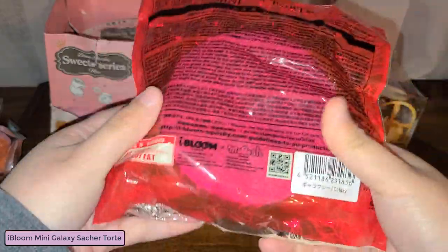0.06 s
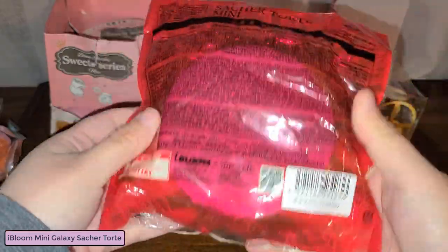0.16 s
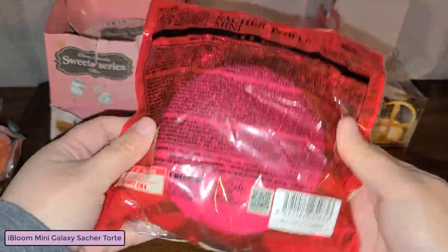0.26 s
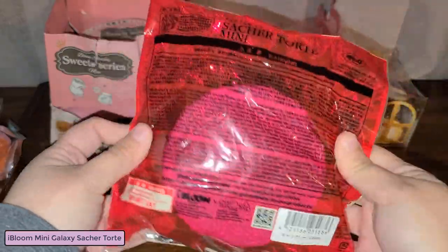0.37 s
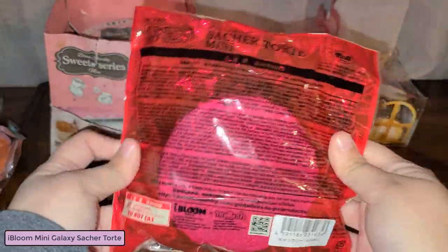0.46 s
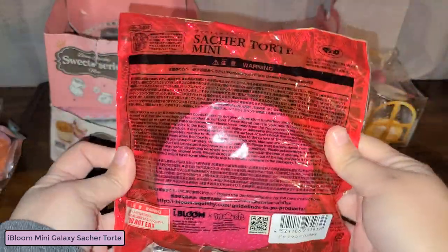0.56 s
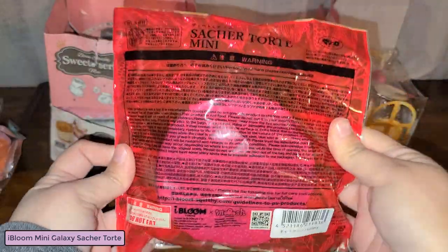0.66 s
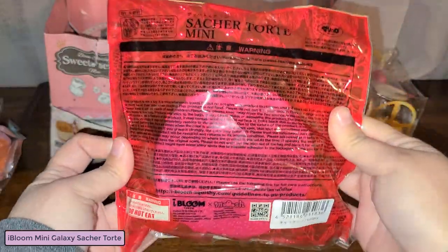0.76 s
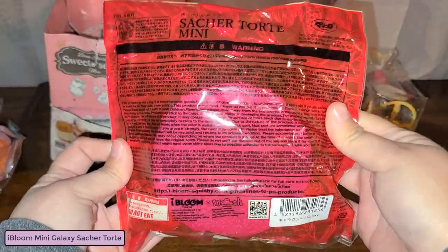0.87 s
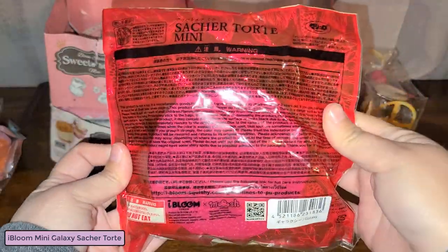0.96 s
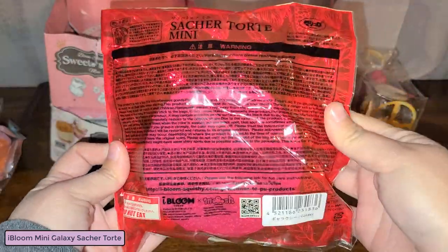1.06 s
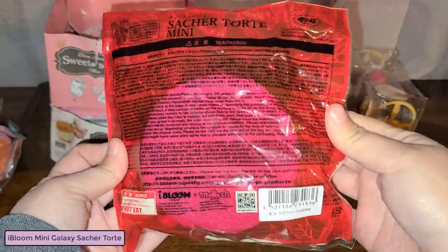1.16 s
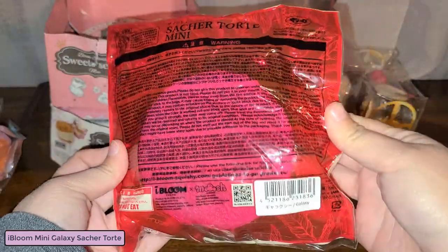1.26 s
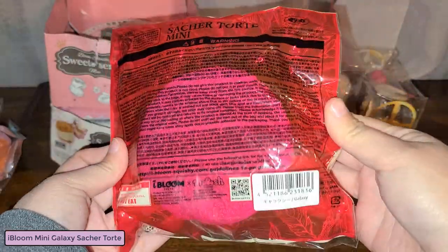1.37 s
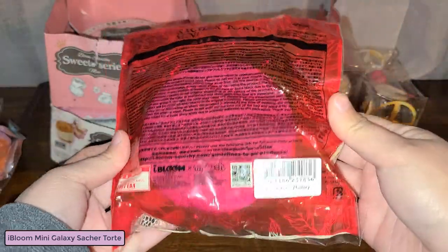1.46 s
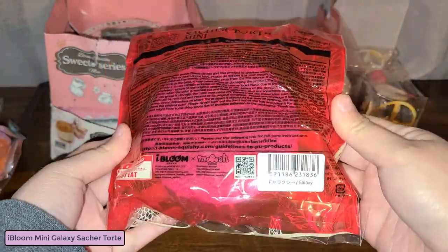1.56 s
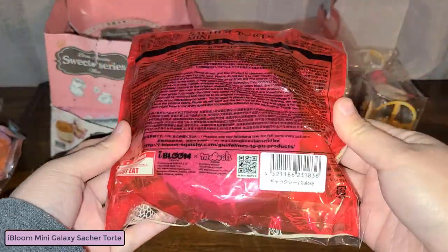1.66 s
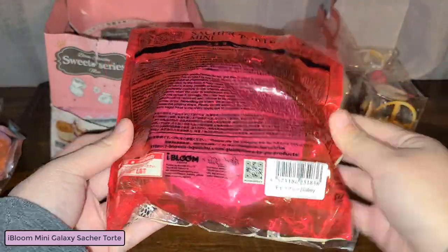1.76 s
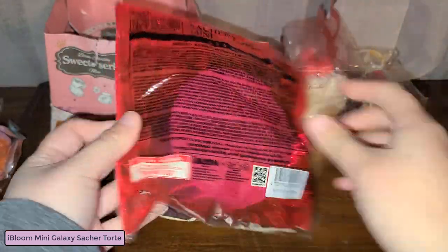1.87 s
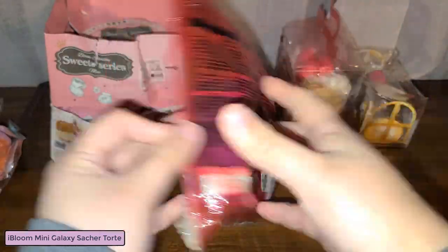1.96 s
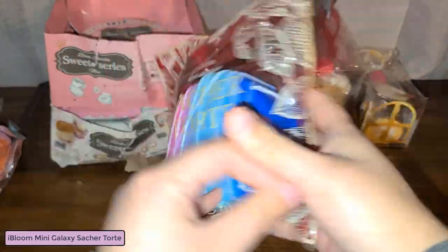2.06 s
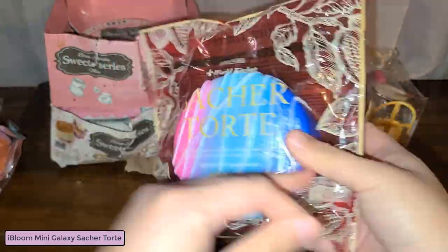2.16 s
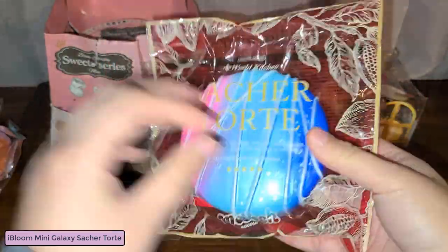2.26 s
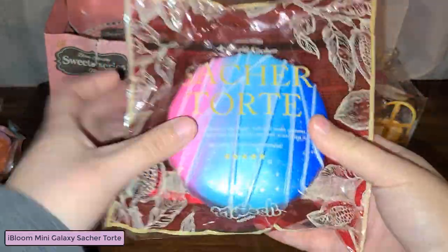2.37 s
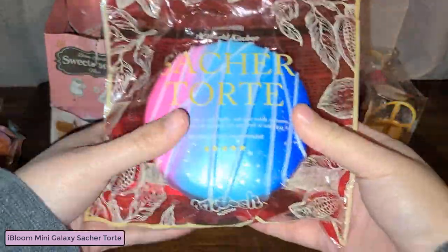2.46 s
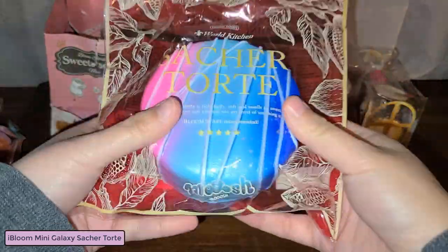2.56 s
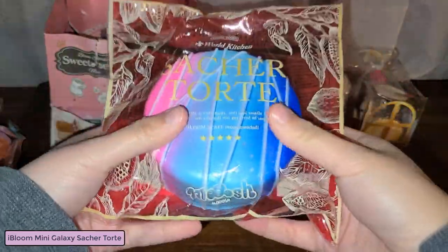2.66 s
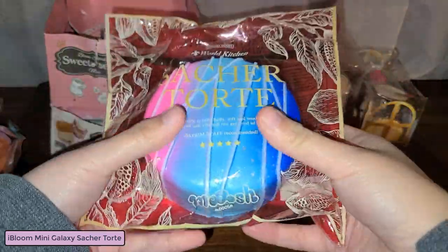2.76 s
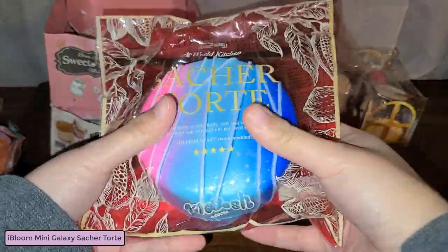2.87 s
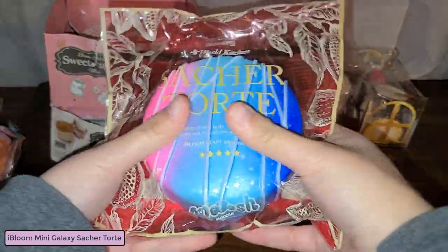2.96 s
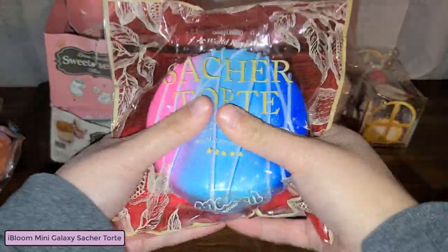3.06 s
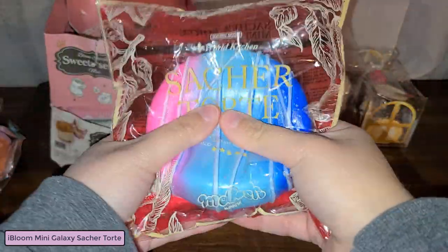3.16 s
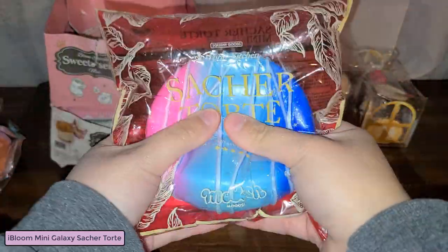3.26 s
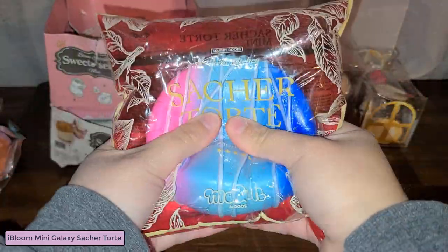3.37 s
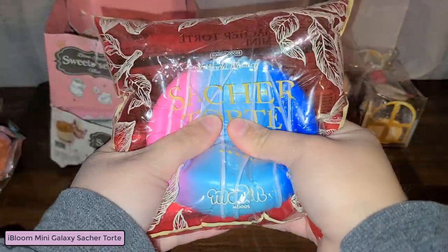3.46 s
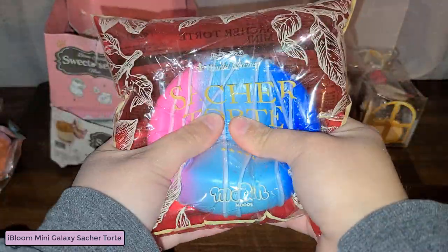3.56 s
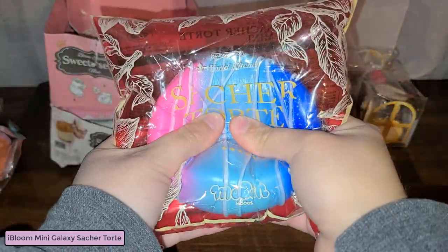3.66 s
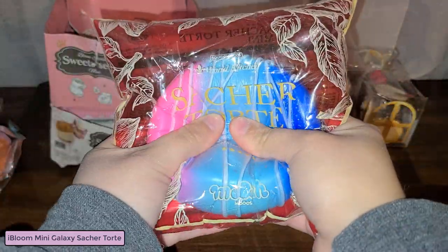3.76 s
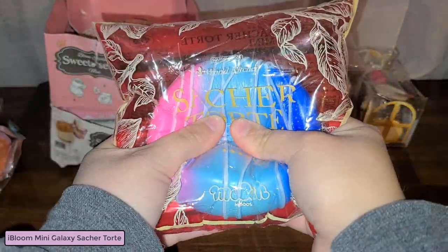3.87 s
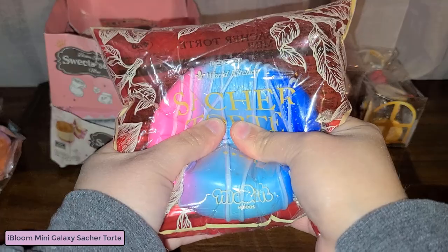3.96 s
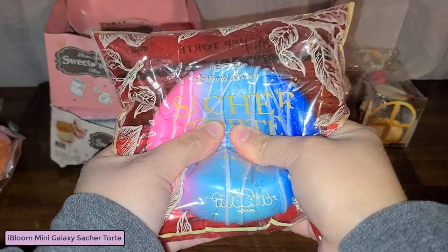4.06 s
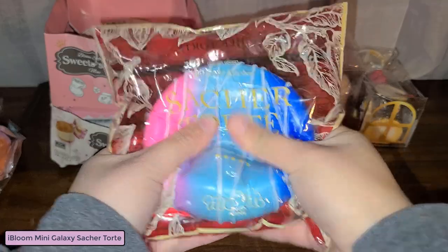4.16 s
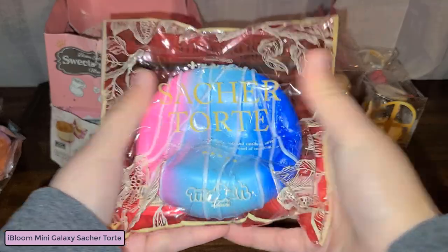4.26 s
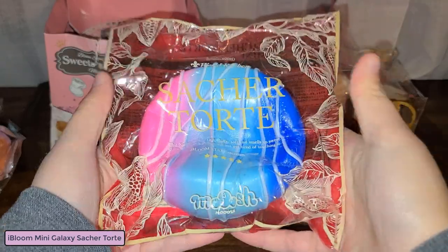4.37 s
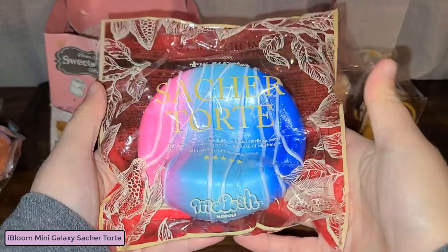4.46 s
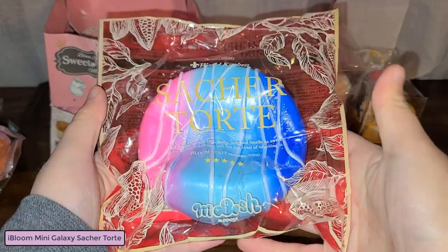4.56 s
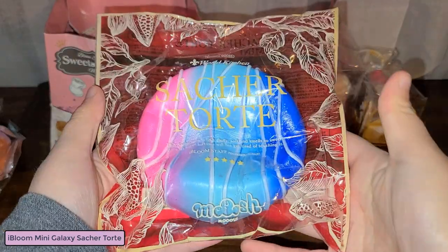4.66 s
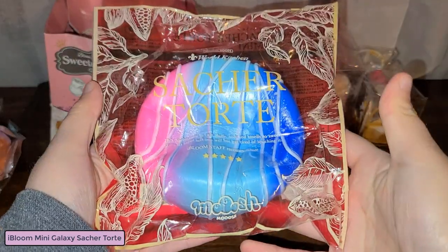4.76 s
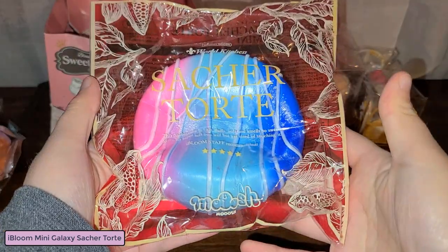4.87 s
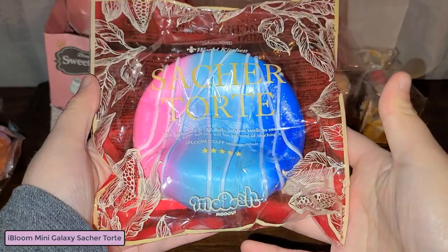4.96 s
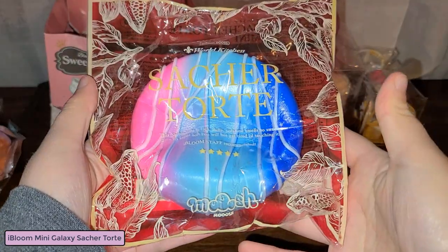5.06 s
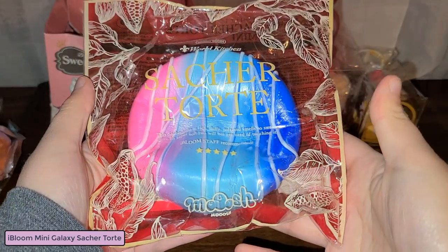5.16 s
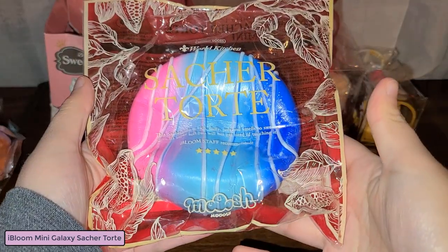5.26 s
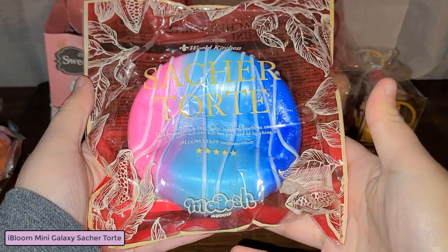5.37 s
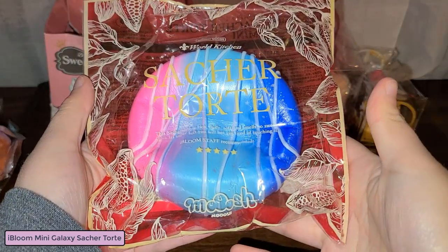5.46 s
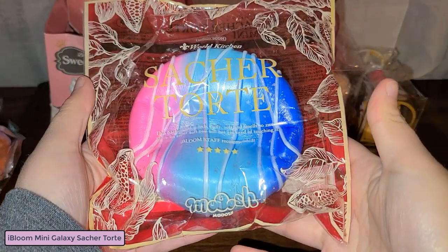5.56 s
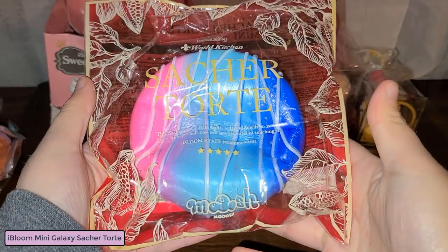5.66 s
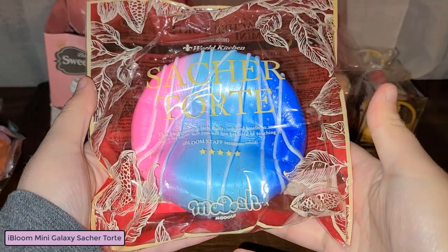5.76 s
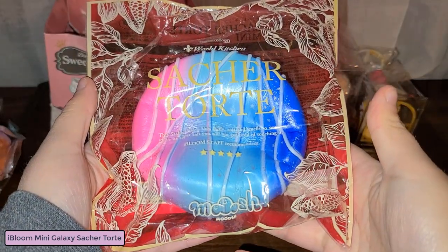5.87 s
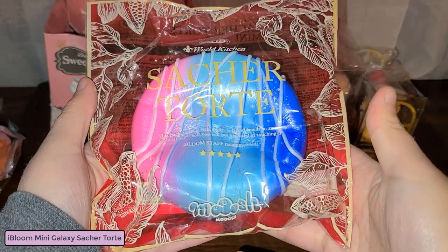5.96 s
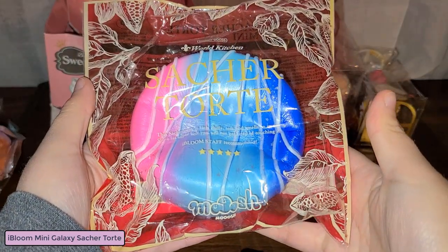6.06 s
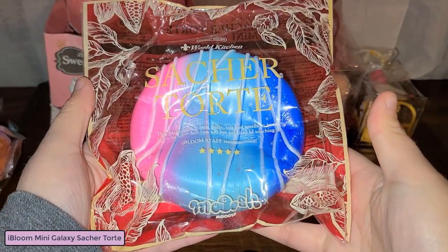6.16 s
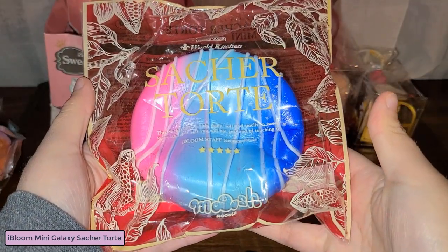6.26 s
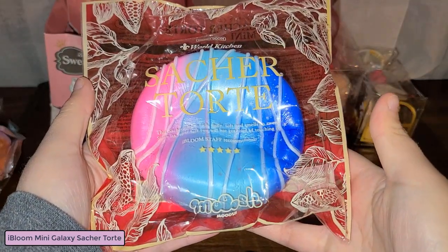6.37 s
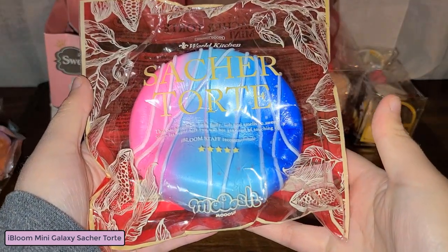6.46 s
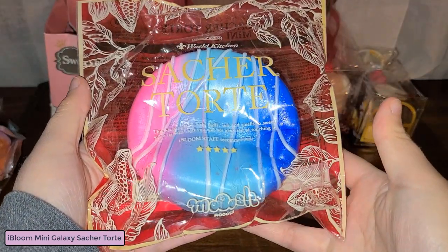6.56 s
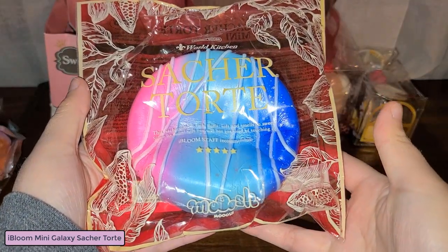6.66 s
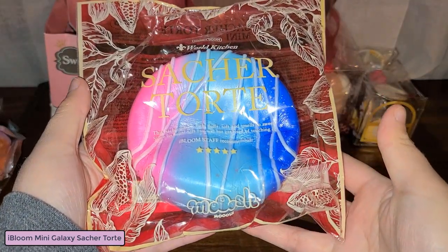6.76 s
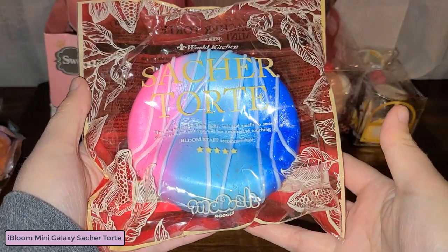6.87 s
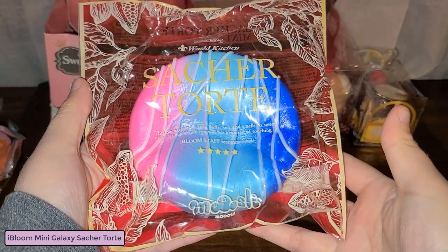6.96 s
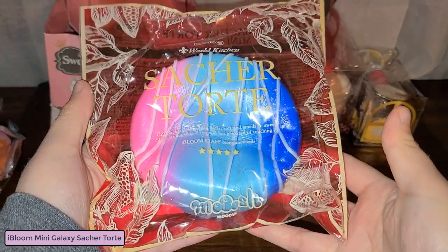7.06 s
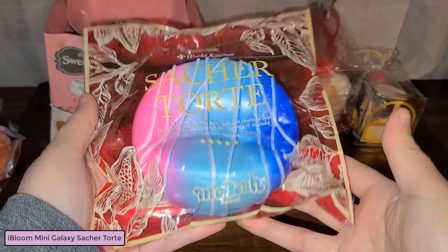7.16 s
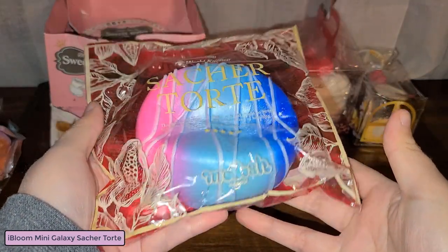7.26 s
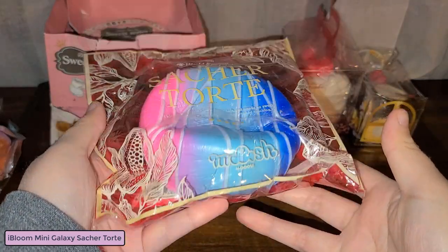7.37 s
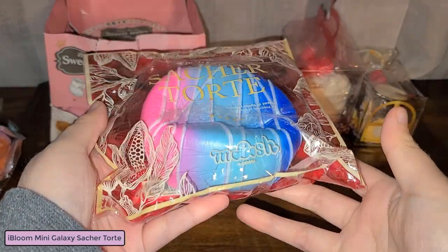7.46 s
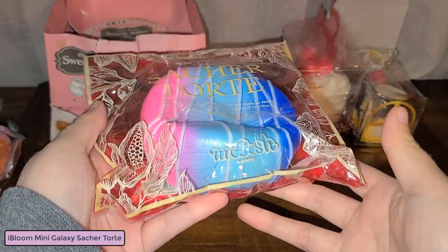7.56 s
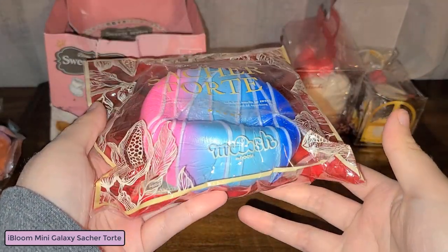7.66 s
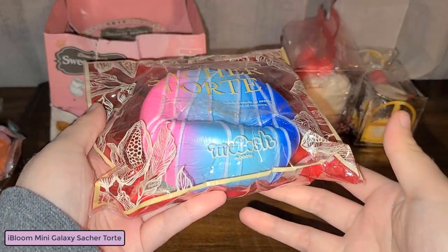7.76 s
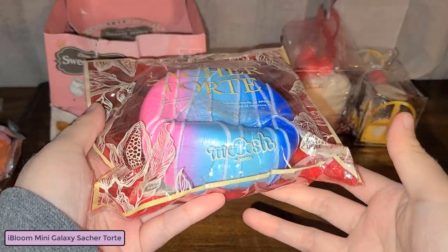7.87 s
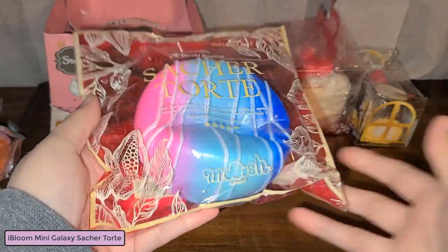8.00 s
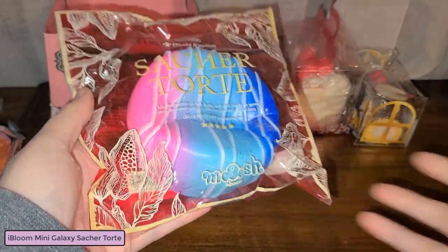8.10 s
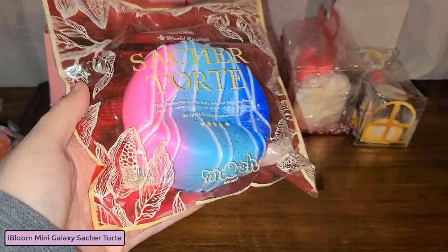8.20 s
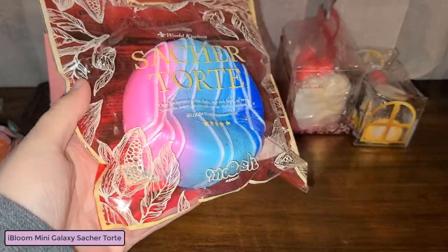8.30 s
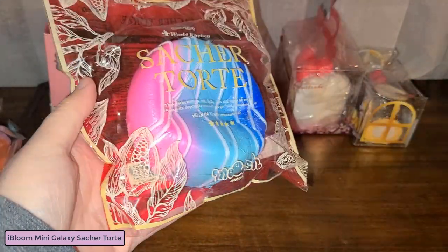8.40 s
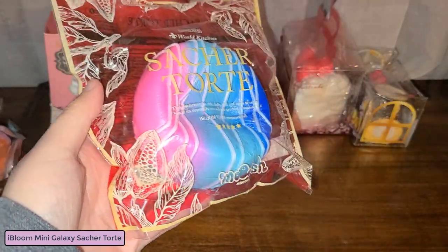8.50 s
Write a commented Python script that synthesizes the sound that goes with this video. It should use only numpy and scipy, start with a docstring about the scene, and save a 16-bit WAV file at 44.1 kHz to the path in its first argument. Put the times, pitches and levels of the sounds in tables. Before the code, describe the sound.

Hands handle a sealed stiff plastic bag holding a soft foam toy in a small, dry furnished room. Dense sharp crackles open, thin to ticks, then a brief flip rustles. A squeeze brings loud crinkling and bright airy hiss, released with more snaps. Sparse creaks and dull taps follow, then a short rustle and a final sharp click. Close stereo microphone, slightly left, faint hiss.

```python
"""A small furnished room: a sealed bag of stiff film with a foam toy inside is handled close to a two-port microphone.
Snapping creases are short noise jolts through boom, panel-ring and treble filters, single or in random crackle.
Fingers rub (band noise) and tap, the moving bag buffets the ports, and the squeezed foam hisses (fluttering noise).
The room answers the film with a diffuse tail; the microphone adds faint hiss, rounds peaks and cuts the top."""
import sys
import numpy as np
from scipy import signal
from scipy.fft import rfft, irfft, next_fast_len
from scipy.io import wavfile

SR = 44100
rng = np.random.default_rng(int(sys.argv[2]) if len(sys.argv) > 2 else 0)


def generate_wav(signal):
    """Clip the signal to [-1, 1] and save it as 16-bit WAV at the path in sys.argv[1]."""
    frames = np.transpose(np.atleast_2d(signal))
    scaled = np.clip(frames, -1, 1) * 32767
    pcm = np.round(scaled).astype(np.int16)
    wavfile.write(sys.argv[1], SR, pcm)


N = 376338

BAG_AIR_HZ, BAG_AIR_WIDTH_HZ = 440, 110
LEFT_BIAS_DB, SIDE_SPREAD_DB = 1.5, 2


def amp(db):
    """Decibels to gain."""
    return 10 ** (np.asarray(db) / 20)


def in_time(rows):
    """Columns of a curve table, one value a sample."""
    s, *columns = np.transpose(rows)
    return [np.interp(np.arange(N) / SR, s, column) for column in columns]


def at_hz(points, hz):
    """A (Hz, value) table read on a log axis."""
    table_hz, values = np.transpose(points)
    return np.interp(np.log(hz + 1), np.log(table_hz), values)


def coloured(x, spectrum):
    """Shapes the last axis by a (Hz, dB) table."""
    size = next_fast_len(x.shape[-1])
    bins_hz = np.arange(size // 2 + 1) * SR / size
    shaped = rfft(x, size) * amp(at_hz(spectrum, bins_hz))
    return irfft(shaped, size)[..., :x.shape[-1]]


def band(x, low_hz, high_hz):
    """Band-pass along the last axis."""
    edges_hz = [low_hz, min(high_hz, SR * .45)]
    return signal.sosfilt(signal.butter(2, edges_hz, "band", fs=SR, output="sos"), x)


def resonance(x, hz, width_hz):
    """One two-pole resonance, gain about 1 on top."""
    r = np.exp(-np.pi * width_hz / SR)
    poles = [1, -2 * r * np.cos(2 * np.pi * hz / SR), r * r]
    return signal.lfilter([(1 - r * r) / 2, 0, (r * r - 1) / 2], poles, x)


def peak_one(x):
    """Each stereo grain scaled to a peak of 1."""
    return x / np.abs(x).max(axis=(-2, -1), keepdims=True)


def drift(rate_hz):
    """Slow chance of spread 1: low-passed noise, drawn every 40 samples."""
    r = np.exp(-80 * np.pi * rate_hz / SR)
    slow = signal.lfilter([1], [1, -2 * r, r * r], rng.standard_normal(N // 40 + 2002))
    slow = slow[2000:]  # past the filter's start-up
    return np.interp(np.arange(N) / 40, np.arange(len(slow)), slow / slow.std())


RISE_DB_PER_S, FALL_DB_PER_S = 700.5, 454  # before the start, after the end


def swell(start_s, top_s, end_s, edge_db):
    """Level curve in dB under its top through start, top and end, with steep flanks outside."""
    s = [start_s - 80 / RISE_DB_PER_S, start_s, top_s, end_s, end_s + 80 / FALL_DB_PER_S]
    return np.interp(np.arange(N) / SR, s, [-80 - edge_db, -edge_db, 0, -edge_db, -80 - edge_db])


SNAP_SAMPLES = 1500
JOLT_MIN_S, JOLT_MAX_S, SETTLE_S = .00025, .0008, .007
LEFT_LEAD_MIN_S, LEFT_LEAD_MAX_S = .00004, .00018  # over the places on the bag


def snap_parts(pitches_hz, settle_db):
    """Boom, panel ring and treble of one snap per pitch: a jolt of up to a millisecond, then the film settles."""
    count = len(pitches_hz)
    t = np.arange(SNAP_SAMPLES) / SR
    white = rng.standard_normal((count, 3, SNAP_SAMPLES))
    leads = (rng.uniform(LEFT_LEAD_MIN_S, LEFT_LEAD_MAX_S, count) * SR).astype(int)
    jolt_s = rng.uniform(JOLT_MIN_S, JOLT_MAX_S, (count, 1, 1))
    rise = 1 - np.exp(-2 * t / jolt_s)
    jolt = rise * np.exp(-t / jolt_s)
    settling = rise * amp(settle_db) * np.exp(-t / SETTLE_S)

    def at_ports(alike, envelope):
        """The two ports hear a shared and an own part; the right one hears later."""
        pair = (np.sqrt(alike) * white[:, :1] + np.sqrt(1 - alike) * white[:, 1:]) * envelope
        pair[:, 1] = [np.roll(right, lead) for right, lead in zip(pair[:, 1], leads)]
        return pair

    low = band(at_ports(.95, jolt + settling), 140, 1100)
    boom = low + amp(5) * resonance(low, BAG_AIR_HZ, BAG_AIR_WIDTH_HZ)
    whole_film = band(at_ports(.7, jolt + settling), 800, 7500)
    struck = at_ports(.7, jolt)
    # only the jolt rings the panel beside the crease; the settling is spread over the whole film
    panel = [resonance(x, hz, 0.21 * hz) for x, hz in zip(struck, pitches_hz)]
    ring = amp(-10.5) * whole_film + panel
    treble = band(at_ports(.2, jolt + settling), 6000, 17000)
    return peak_one(boom), peak_one(ring), peak_one(treble)


def add(out, s, grain):
    """Mixes a stereo grain in at time s."""
    i = int(s * SR)
    out[:, i:i + SNAP_SAMPLES] += grain[:, :N - i]


# Moves of the hands: tilted up (2 rows), regripped and flipped over (2), squeezed, thumbs hold,
# let go and bag straightens (2), tipped back (3). Each row: start in seconds, top in seconds, end in seconds,
# crackle in dB, boom of the trapped air in dB re crackle, buffeting in dB re crackle.
MOVES = [(-0.05, 0.0, 0.11, -27, -4.5, -3), (0.044, 0.285, 0.45, -31.5, -8.5, -11),
         (1.691, 1.751, 1.79, -44, -11, -22), (1.921, 1.97, 2.168, -31.5, -9, -6),
         (2.952, 3.162, 3.37, -18.5, -8, -14), (3.486, 3.704, 3.55, -51, -27, -20),
         (4.08, 4.129, 4.35, -20, -8.5, -21), (4.365, 4.44, 4.46, -35.5, -7.5, -5),
         (7.113, 7.257, 7.29, -50, -8.5, -9), (7.272, 7.299, 7.4, -37, -9.5, -11),
         (7.535, 7.55, 7.64, -54.5, -7, 15)]
# Faint creaking of the film between moves. Each row: time in seconds, level in dB.
CREAK = [(0.55, -82), (0.8, -66.5), (1.5, -65), (2.3, -78.5), (2.6, -60.5), (2.9, -57.5), (4.6, -62.5),
         (4.88, -77), (5.15, -62), (5.5, -77), (6.3, -71.5), (6.45, -92), (7.08, -87.5), (7.5, -77),
         (8.2, -67), (8.35, -100)]
MOVE_EDGE_DB, CREAK_BOOM_DB = 13.5, -6.5
BOOM_SWING = 1.02  # the boom rises and falls more steeply than the crackle


def handling():
    """Crackle, boom and buffeting levels in time: the strongest of the moves and the creaking."""
    creak_db, = in_time(CREAK)
    levels = [creak_db + np.array([[0], [CREAK_BOOM_DB], [CREAK_BOOM_DB]])]
    for start_s, top_s, end_s, db, boom_db, buffet_db in MOVES:
        shape_db = swell(start_s, top_s, end_s, MOVE_EDGE_DB)
        levels.append(db + np.array([shape_db, BOOM_SWING * shape_db + boom_db, shape_db + buffet_db]))
    return np.max(levels, axis=0)


def crackle(level_db, boom_db):
    """Small snaps at random; the harder the handling, the denser, and they come in clumps."""
    harder_db = level_db + 20
    clump_db = np.clip(-.2 * (level_db + 10), 2.5, 9)  # gentle handling comes in fits
    per_s = 1600 * amp(.35 * harder_db + clump_db * drift(22))
    boom, ring, treble = snap_parts(np.geomspace(900, 5500, 120), settle_db=-22)
    size_db = 5 * np.minimum(rng.exponential(1, N), 4) - .15 * harder_db
    kinds = rng.integers(0, 120, N)
    tilt_db = rng.normal(-2.4, 8.55, N) + .35 * harder_db  # gentle handling is duller
    pan_db = rng.normal(LEFT_BIAS_DB, SIDE_SPREAD_DB, N)
    out = np.zeros((2, N))
    for i in np.flatnonzero(rng.random(N) < per_s / SR):
        k = kinds[i]
        grain = amp(level_db[i]) * (ring[k] + amp(tilt_db[i]) * treble[k]) + amp(boom_db[i]) * boom[k]
        add(out, i / SR, amp(size_db[i] + pan_db[i] * np.array([[.5], [-.5]])) * grain)
    return out


RUB_DB, RUB_BOOM_DB, RUB_FITS_DB = -7.5, -0.5, 5.5  # re crackle, its boom, how fitful
RUB_MOST_DB = -43.5  # crackle level above which rubbing grows no louder


def rubbing(level_db, boom_db):
    """Fingers slide over the film: a soft rustle, and a murmur of the trapped air."""
    slide_db = np.minimum(level_db, RUB_MOST_DB) + RUB_DB
    rustle = band(rng.standard_normal((2, N)) + rng.standard_normal(N), 840, 3300)
    murmur = resonance(rng.standard_normal(N), BAG_AIR_HZ, BAG_AIR_WIDTH_HZ)
    rustle_db = slide_db + RUB_FITS_DB * drift(21)
    murmur_db = slide_db + boom_db - level_db + RUB_BOOM_DB + RUB_FITS_DB * drift(16)
    return amp(rustle_db) * rustle / rustle.std() + amp(murmur_db) * murmur / murmur.std()


RUMBLE_LEFT_DB, RUMBLE_RIGHT_DB, RUMBLE_TOP_HZ = -6.5, -7.5, 116  # levels re buffeting


def rumble(buffet_db):
    """Air pushed by the moving bag buffets each port on its own."""
    puffs = band(rng.standard_normal((2, N)), 20, RUMBLE_TOP_HZ)
    gusts_db = 4 * drift(10)
    ports_db = np.array([[RUMBLE_LEFT_DB], [RUMBLE_RIGHT_DB]])
    return amp(buffet_db + gusts_db + ports_db) * puffs / puffs.std()


# Clear snaps of a crease. Each row: start in seconds, peak of the ring in dB, panel pitch in Hz,
# boom in dB re that peak, treble in dB re that peak.
SNAPS = [(0.031, -8.5, 3000, -13, 7.5), (0.063, -10, 2770, -9, 11), (0.114, -11, 3037, -13, 10.5),
         (0.177, -1.5, 3400, -19.5, -50.5), (0.185, -11, 3600, -20, 2), (0.221, -8.5, 2320, -4.5, 11),
         (0.232, -5.5, 2330, -15.5, -17), (0.251, -10.5, 3640.0, -19, 6.5), (0.275, 4, 5650, -16.5, 2.5),
         (0.34, 0, 6200, -17, -1), (0.366, -9, 3950, -17, -6), (0.377, -9, 6470, -1.5, 11.5),
         (0.454, -2.5, 5700, -15, -1), (0.481, -10, 2620, -8.5, 12), (0.584, -24.5, 2470, -9, 0.5),
         (0.615, -13.5, 3140, -22, 6), (0.808, -21, 1720, -27, -4), (0.817, -23, 1850, -6, -5),
         (0.838, -23.5, 1280, 1.5, -15), (0.893, -15.5, 1500, -11.5, -44), (1.03, -26.5, 2240, -4.5, 4.5),
         (1.045, -18, 3500, -7, -30), (1.236, -24, 1640, -11.5, 4.5), (1.305, -27.5, 1520, -13, -12),
         (1.475, -22.5, 2500, -9, -16), (1.518, -6.5, 6130, -16, -1), (1.601, -17, 3140, -24, -11),
         (1.61, -15, 4340, -22, 5.5), (1.623, -15, 1790, -33, -17), (1.864, -7, 1730, -17.5, 2),
         (2.143, -20, 2370.0, -8.5, 4), (2.166, -3, 5560, -15.5, 0), (2.187, -0.5, 3030, -20, 1.5),
         (2.33, -25.5, 6260, -18, -1), (2.365, -21.5, 6900, -12.5, 0.5), (2.491, -28.5, 1840, -8, -11),
         (2.522, -24, 2220, -14, 5), (2.565, -16, 2920, -10.5, 4.5), (2.643, -14, 3140, -18, -36),
         (2.762, -18.5, 2360, -8.5, -10), (2.801, -25.5, 2680, -20, -9), (2.842, -13, 2160, -13, -1.5),
         (2.897, -2, 3230, -19, 6), (2.917, -5, 3370, -15.5, -1), (2.979, -6.5, 3400, -12, -10),
         (3.011, -9.5, 2960, -5, -3), (3.221, -1, 1450, -18, -5), (3.336, 3.5, 1370, -30, 2.5),
         (3.358, -9.5, 5060, -21.5, 8), (3.372, -6.5, 3995, -22, 5), (3.379, -2.5, 1440, -17, -1),
         (3.391, -1.5, 2760, -21, 4.5), (3.412, -0.5, 3220, -23, 3.5), (3.447, -9, 3180, -25, 5),
         (3.466, -12, 2850, -13, -1), (3.603, -19.5, 1640, -14, 8), (3.74, -18.5, 5500, -22.5, -6),
         (3.825, -11.5, 4060, -39, 4), (3.831, -9, 6150, -30, 2), (3.895, -24.5, 3240, -34, -12),
         (3.932, -7.5, 3570, -27, 5.5), (3.959, -20.5, 1510, -7, 14.5), (4.004, -24, 5900, -14, 12.5),
         (4.026, -11, 1880, -17.5, 2.5), (4.043, -17.5, 5160, -30, 6), (4.078, -5.5, 1430, -18, -2),
         (4.098, -6.5, 2540, -35, -13), (4.167, 4.5, 1790, -38, 2), (4.293, -3, 2940, -12, -1),
         (4.323, 2, 5200, -11, 6), (4.362, -12, 5930, -21, -15), (4.385, -16, 2500, -17, -14),
         (4.415, -17.5, 3300, -5, 12.5), (4.437, -6.5, 2930, -13.5, 7.5), (4.476, -6, 3070, -8.5, 11.5),
         (4.512, -7.5, 1690, -14.5, 0), (4.544, -12.5, 2870, -7, -7), (4.611, -12.5, 2010, -14, 8),
         (4.664, -17.5, 3200, -14.5, 1), (4.736, -10, 3000, -13, -27), (4.755, -17, 6017, -19.5, 11),
         (4.917, -20.5, 2760, -16, -13), (4.952, -19.5, 2930, -12.5, 0), (4.998, -29, 3070, -5.5, 5),
         (5.058, -24.5, 2320, -5.5, 7), (5.108, -23.5, 5400, -20, -6), (5.18, -25, 1670, -42, -9),
         (5.221, -25, 1730, -50, -6), (5.309, -18, 2180, -16.5, -6), (5.349, -24, 2760, -13.5, -9),
         (5.4, -10, 2800, -21.5, -1.5), (5.587, -31, 2820.0, -5.5, -15), (5.614, -28.5, 2730, -13, 2),
         (5.755, -29.5, 2440, -12, -9.5), (5.857, -13.5, 4620, -22, 4), (6.089, -33, 2640, -2.5, -9.5),
         (6.152, -19.5, 1900, -14.5, -8), (6.172, -27, 3000, -21, -19), (6.303, -29, 2640, -14.5, -4),
         (6.32, -25, 3080, -13.5, -2), (6.331, -20.5, 3220, -16, 4), (6.468, -23, 1420, -15, -5),
         (6.488, -15, 2490, -10, 6), (6.791, -37, 2025, -10.5, -13), (6.868, -22, 2690, -15.5, -6.5),
         (7.099, -37, 4060, -8.5, -10), (7.141, -20, 3120, -17, -7.5), (7.288, -4.5, 5170, -21, 3.5),
         (7.3, -14, 3520, -4.5, 6.5), (7.357, -21.5, 2430, -3.5, -1), (7.379, -22, 1750, -3.5, 0),
         (7.399, -30, 2770, 1, -2), (7.526, -21.5, 1920, -12, 4.5), (7.551, -20, 3549, -4, 3.5),
         (7.837, -17, 1830, -15, 2.5), (7.923, -18, 1180, -8.5, -3), (7.98, -22.5, 5200, -16, -4),
         (7.997, -15.5, 1770, -18.5, -9), (8.049, -29, 3100, -20, -7), (8.4601, -3.5, 4350, -18, 5)]


def snaps():
    """The clear snaps, each with its own colour, mostly left of centre."""
    out = np.zeros((2, N))
    parts = snap_parts(np.array(SNAPS)[:, 2], settle_db=-14.5)
    pans_db = rng.normal(LEFT_BIAS_DB, SIDE_SPREAD_DB, len(SNAPS))
    for row, pan_db, boom, ring, treble in zip(SNAPS, pans_db, *parts):
        s, peak_db, _, boom_db, treble_db = row
        grain = ring + amp(boom_db) * boom + amp(treble_db) * treble
        add(out, s, amp(peak_db + pan_db * np.array([[.5], [-.5]])) * grain)
    return out


# Dull taps of a fingertip on the puffed bag. Each row: start in seconds, peak of the boom in dB.
TAPS = [(0.689, -42), (0.738, -30.5), (0.76, -32.5), (1.33, -31.5), (1.442, -34.5), (1.895, -30),
        (5.683, -36), (5.937, -31), (7.618, -30), (7.627, -30), (7.901, -31.5), (8.15, -39), (8.22, -32)]
TAP_HZ, TAP_RING_DB = 1320, -13.5  # faint panel ring, re boom


def taps():
    """Soft contacts wake the trapped air and hardly the film."""
    out = np.zeros((2, N))
    booms, rings, _ = snap_parts(np.full(len(TAPS), TAP_HZ), settle_db=-11.5)
    for (s, peak_db), boom, ring in zip(TAPS, booms, rings):
        add(out, s, amp(peak_db) * (boom + amp(TAP_RING_DB) * ring))
    return out


# Colour of all film sounds. Each row: frequency in Hz, gain in dB.
FILM_COLOUR = [(250, -4), (1000, 3.5), (1500, 9.5), (2000, 6.5), (2800, 9.5), (7000, 4.5), (8300, -4),
               (12000, -3.5), (16000, -6.5)]


def film_sounds(level_db, boom_db):
    """Everything the film radiates passes one common colouring."""
    contacts = snaps() + taps()
    return coloured(contacts + crackle(level_db, boom_db) + rubbing(level_db, boom_db), FILM_COLOUR)


# Reverberation time of the room. Each row: frequency in Hz, 60 dB decay in seconds.
ROOM_T60 = [(300, 0.082), (1500, 0.1), (6000, 0.1), (15000, 0.092)]
ROOM_DB = -11


def room(x):
    """A diffuse tail, alike at both ports in the bass only, its decay time set by frequency."""
    t, tail = np.arange(SR // 3) / SR, 0
    edges_hz = 100 * 2.0 ** np.arange(8.5)
    for low, high in zip(edges_hz, edges_hz[1:]):
        t60_s = at_hz(ROOM_T60, np.sqrt(low * high))
        shared, own = rng.standard_normal(len(t)), rng.standard_normal((2, len(t)))
        mixed = band(shared * 500 / low + own, low, high) / np.hypot(500 / low, 1)
        tail = tail + mixed * amp(-60 * t / t60_s)
    tail = tail * (1 - np.exp(-t / 0.016))  # reflections build up gradually
    tail = tail / np.sqrt(np.sum(tail ** 2, axis=1, keepdims=True))
    return signal.fftconvolve(x.mean(axis=0, keepdims=True), tail, axes=1)[:, :N]


# Air leaving, then re-entering the foam. Each row: start in seconds, strongest in seconds, end in seconds,
# level in dB.
AIR = [(2.972, 3.293, 3.975, -25), (4.097, 4.282, 4.4, -24.5)]
# Spectrum of the air hiss. Each row: frequency in Hz, relative density in dB per Hz.
AIR_COLOUR = [(600, -26.5), (1680, -23), (2150, -17), (2950, 7), (6920, 7), (8270, 4), (12000, 6.5),
              (16000, 6)]
# Breathy bands where air passes narrow pores, sliding as the foam yields.
# Each row: time in seconds, lower band centre in Hz, upper band centre in Hz.
PORES = [(3.6, 4680, 6823), (3.8, 4160, 5730)]
AIR_EDGE_DB, AIR_FLUTTER_DB = 8.5, 2.5
PORE_DB, PORE_WIDTH_HZ = -11, 860


def foam_air():
    """A bright hiss while the thumbs press and let go; its narrow bands each waver on their own."""
    level_db = np.max([swell(*times, AIR_EDGE_DB) + db for *times, db in AIR], axis=0)
    jets = coloured(rng.standard_normal((2, 2, N)), AIR_COLOUR)  # neighbouring bands are unrelated
    edges_hz = np.geomspace(500, 17000, 15)
    jet = 0
    for k in range(len(edges_hz) - 1):
        jet = jet + amp(AIR_FLUTTER_DB * drift(4.0)) * band(jets[k % 2], *edges_hz[k:k + 2])
    jet = jet / jet.std()
    for hz in in_time(PORES):
        carrier = np.sin(2 * np.pi * np.cumsum(hz) / SR)
        breath = band(rng.standard_normal((2, N)), 10, PORE_WIDTH_HZ / 2) * carrier
        jet = jet + amp(PORE_DB + AIR_FLUTTER_DB * drift(10)) * breath / breath.std()
    return amp(level_db + drift(25)) * jet


THUMP_S, THUMP_HZ, THUMP_DB = 3.466, 55, -36


def thump():
    """The thumbs bottom out: one soft low push of two cycles."""
    cycles = np.clip((np.arange(N) / SR - THUMP_S) * THUMP_HZ, 0, 2)
    return amp(THUMP_DB) * np.sin(2 * np.pi * cycles) * np.sin(np.pi * cycles / 2)


def scene():
    """Bag and foam in the room."""
    level_db, boom_db, buffet_db = handling()
    film = film_sounds(level_db, boom_db)
    return film + amp(ROOM_DB) * room(film) + foam_air() + rumble(buffet_db) + thump()


# Spectrum of the microphone hiss. Each row: frequency in Hz, relative density in dB per Hz.
HISS = [(25, -13.5), (59, -10), (161, -21), (405, -22), (4610, -35.5), (6380, -19), (8590, -40.5),
        (13600, -35.5), (16000, -37.5)]
HISS_DB, CUTOFF_HZ = -62.5, 16500


def record(dry):
    """Microphone hiss, rounded peaks, the top cut off."""
    hiss = coloured(rng.standard_normal((2, N)), HISS)
    heard = dry + amp(HISS_DB) * hiss / hiss.std()
    heard = .8 * np.tanh(heard / .8)
    return signal.sosfilt(signal.cheby2(14, 70, CUTOFF_HZ, fs=SR, output="sos"), heard)


dry = scene()
out = record(dry)
generate_wav(out)
```